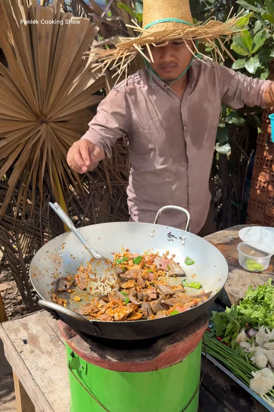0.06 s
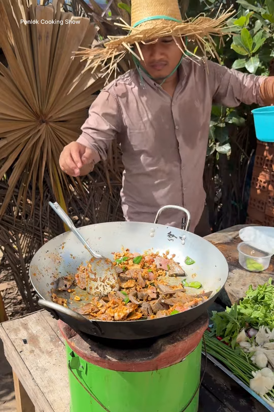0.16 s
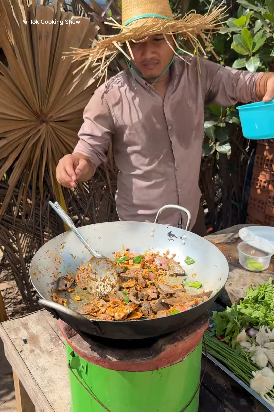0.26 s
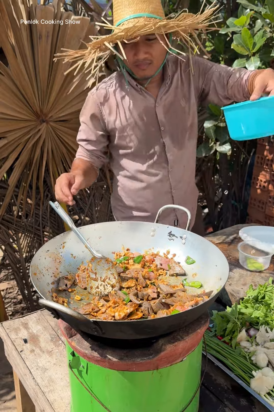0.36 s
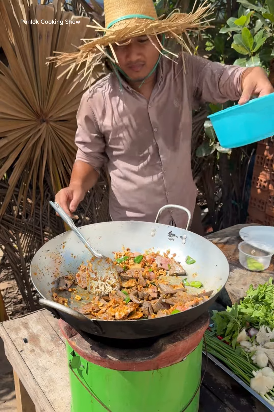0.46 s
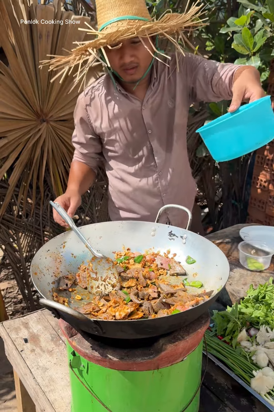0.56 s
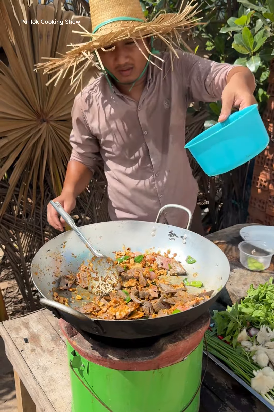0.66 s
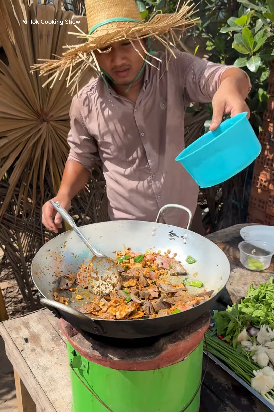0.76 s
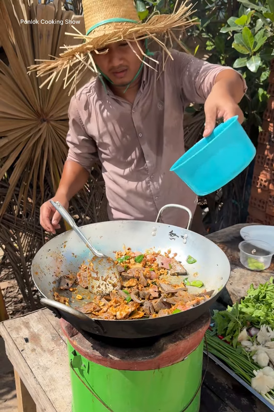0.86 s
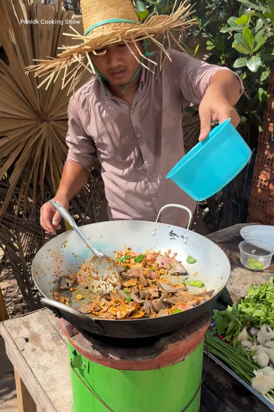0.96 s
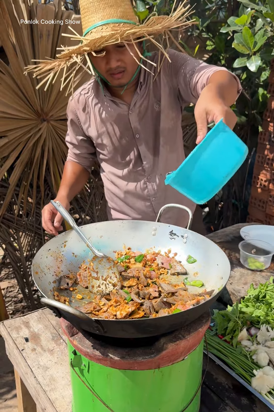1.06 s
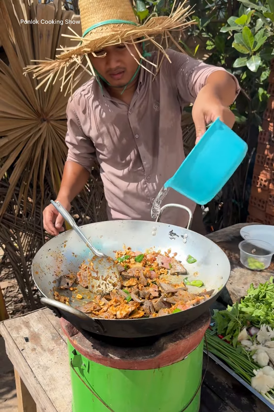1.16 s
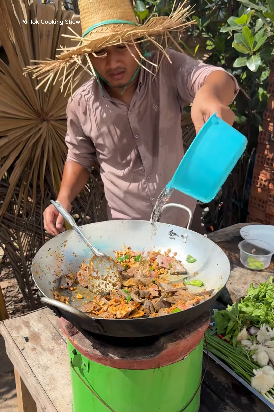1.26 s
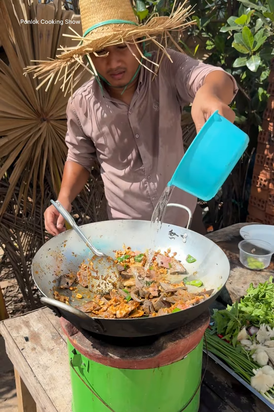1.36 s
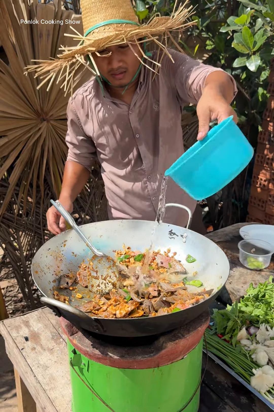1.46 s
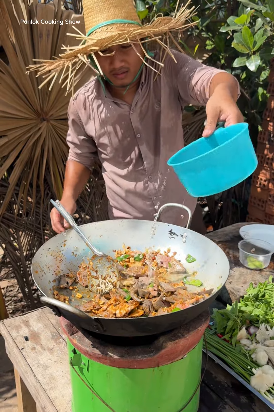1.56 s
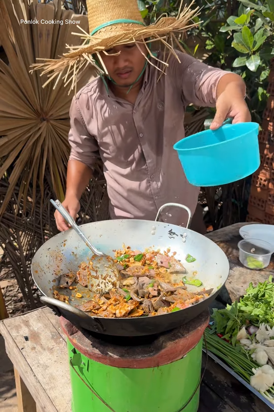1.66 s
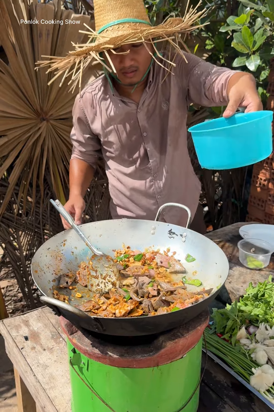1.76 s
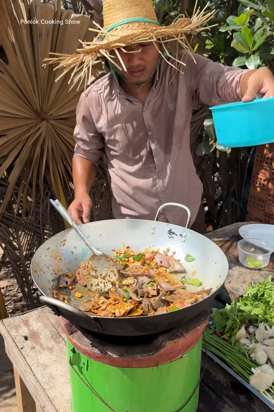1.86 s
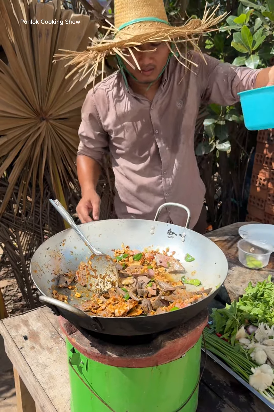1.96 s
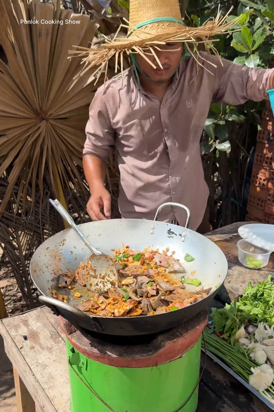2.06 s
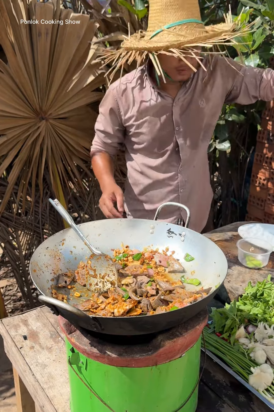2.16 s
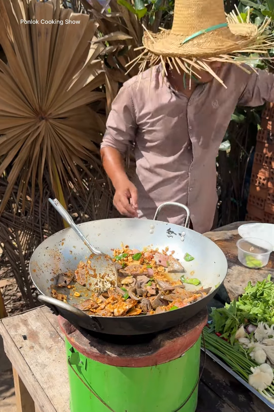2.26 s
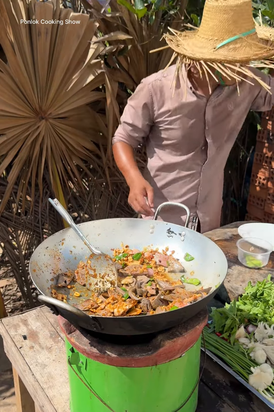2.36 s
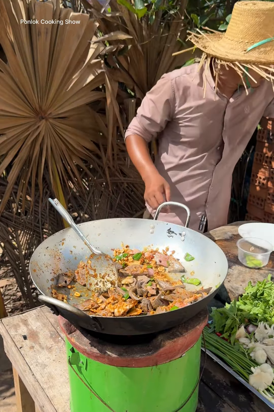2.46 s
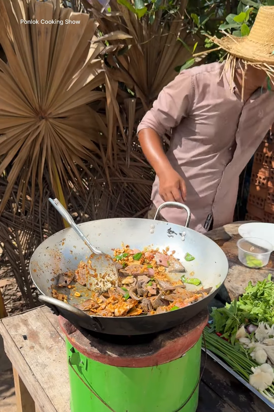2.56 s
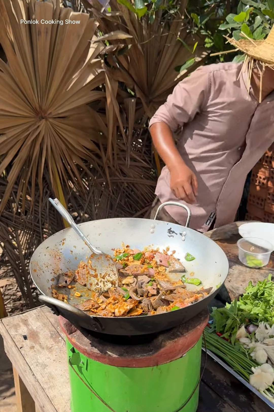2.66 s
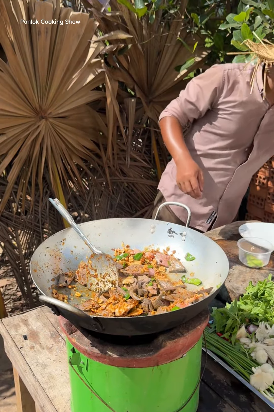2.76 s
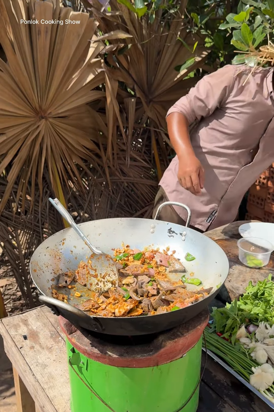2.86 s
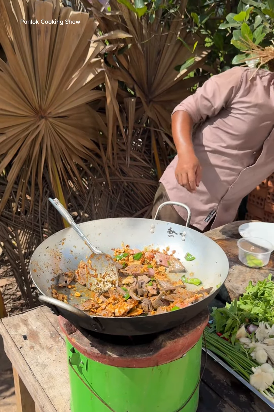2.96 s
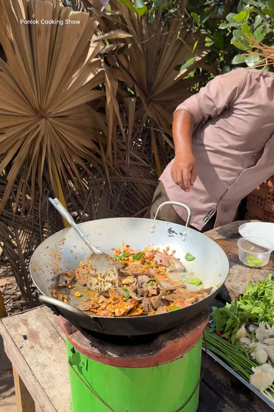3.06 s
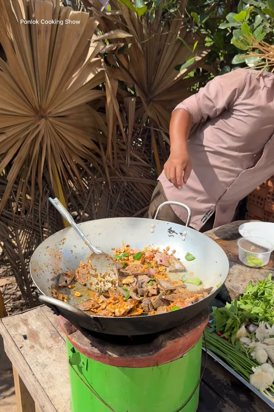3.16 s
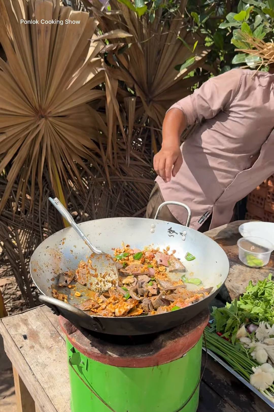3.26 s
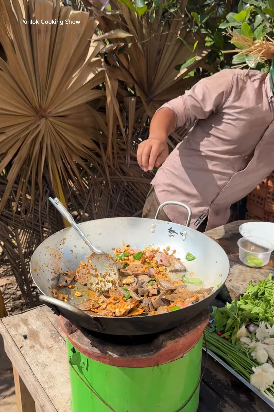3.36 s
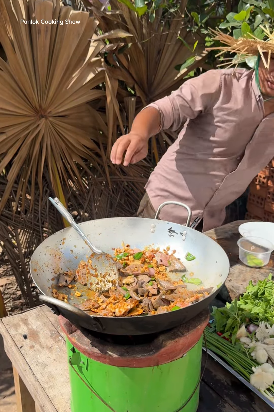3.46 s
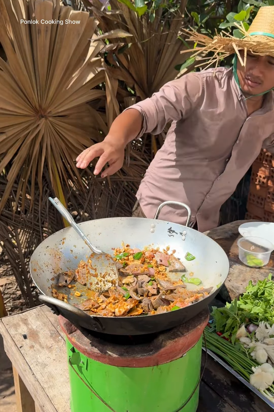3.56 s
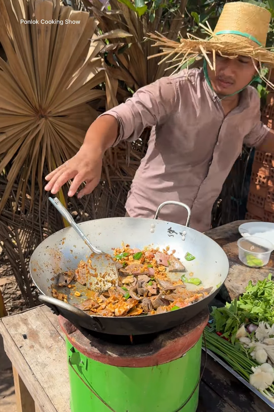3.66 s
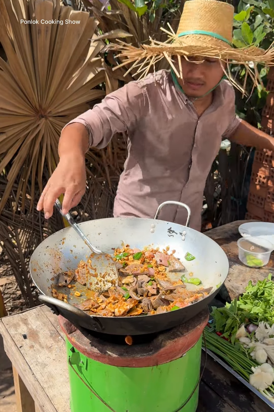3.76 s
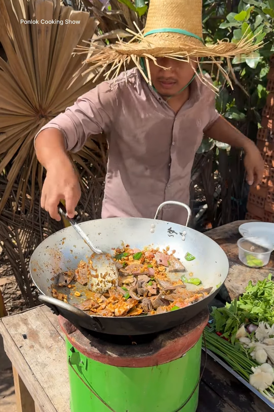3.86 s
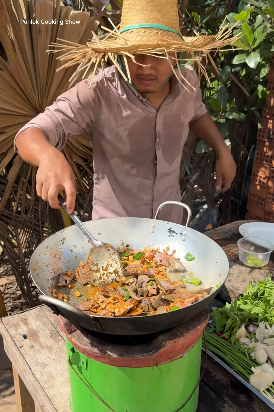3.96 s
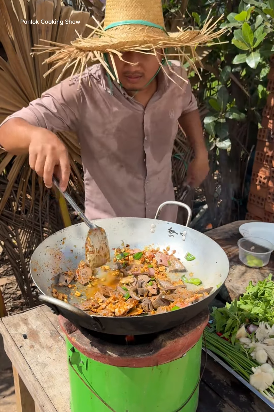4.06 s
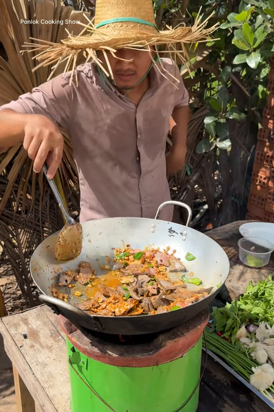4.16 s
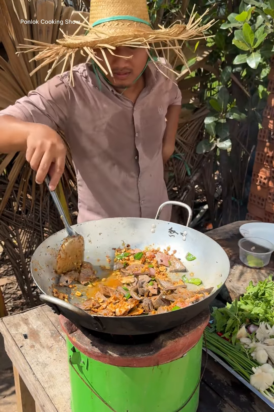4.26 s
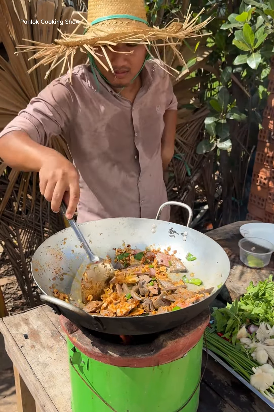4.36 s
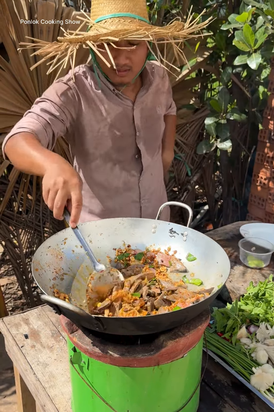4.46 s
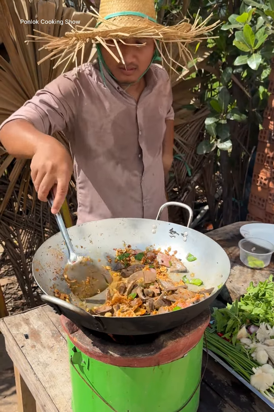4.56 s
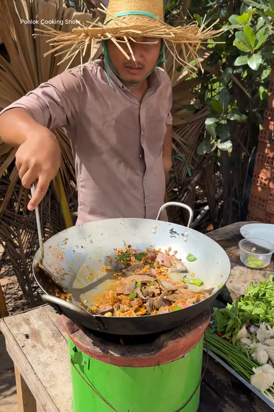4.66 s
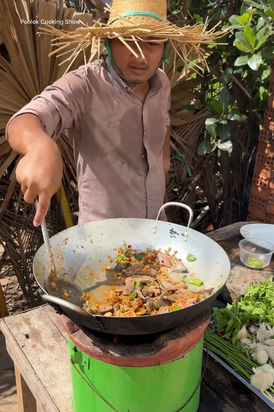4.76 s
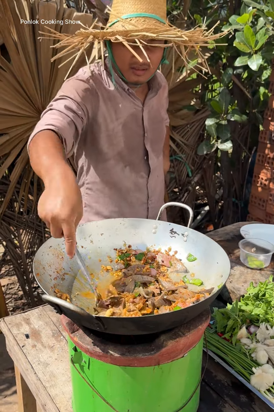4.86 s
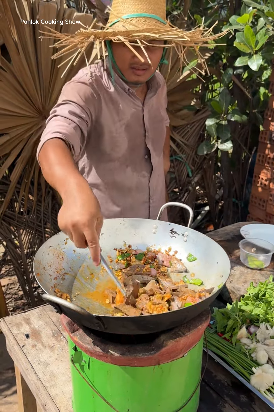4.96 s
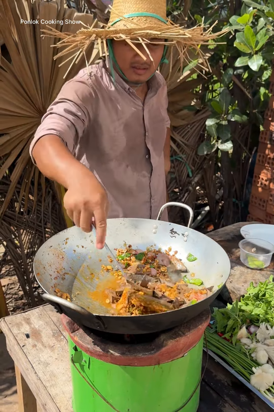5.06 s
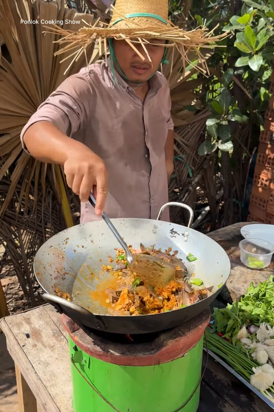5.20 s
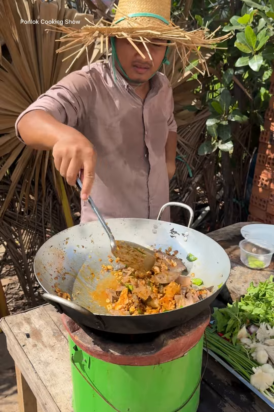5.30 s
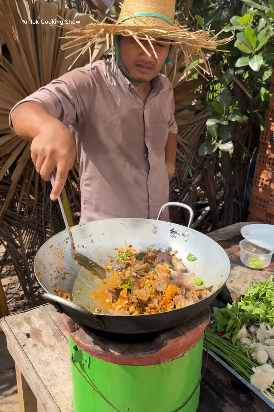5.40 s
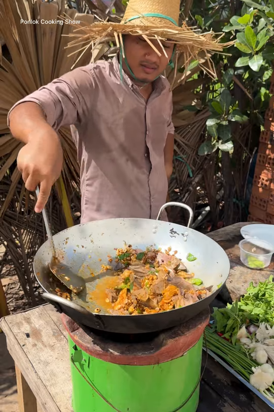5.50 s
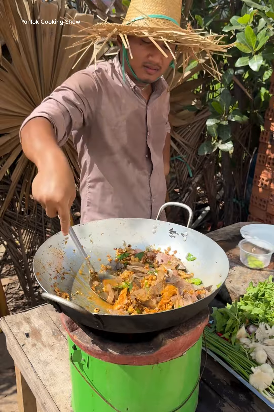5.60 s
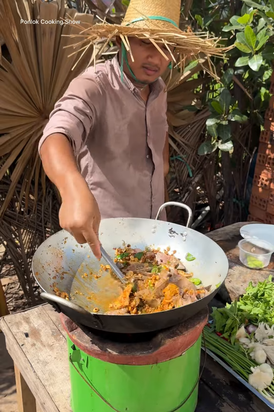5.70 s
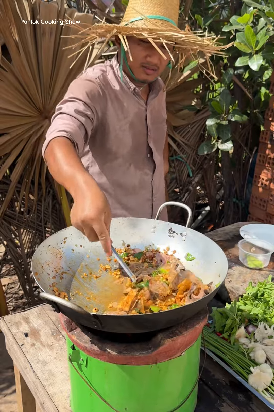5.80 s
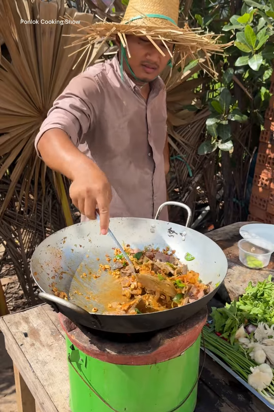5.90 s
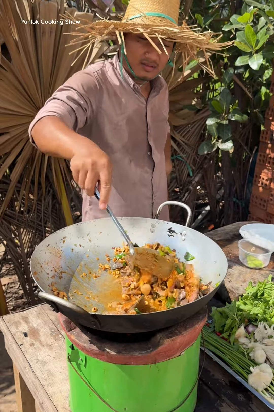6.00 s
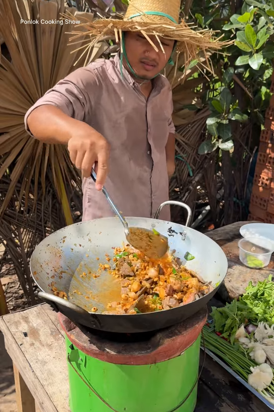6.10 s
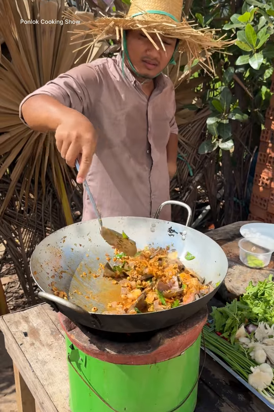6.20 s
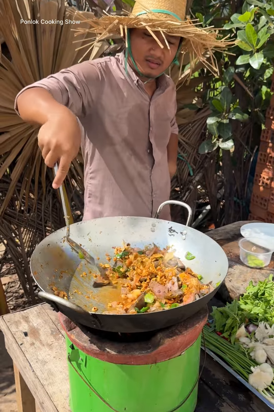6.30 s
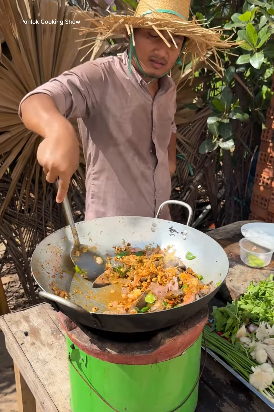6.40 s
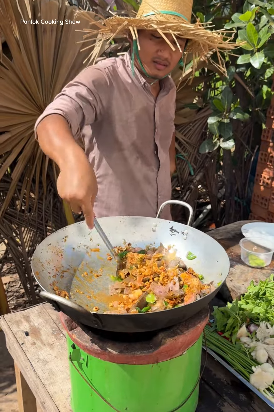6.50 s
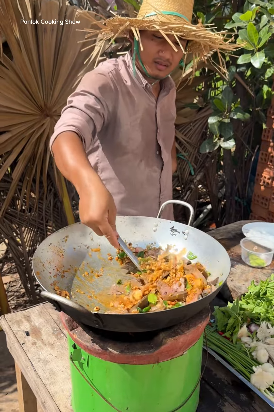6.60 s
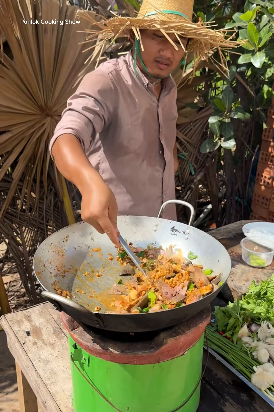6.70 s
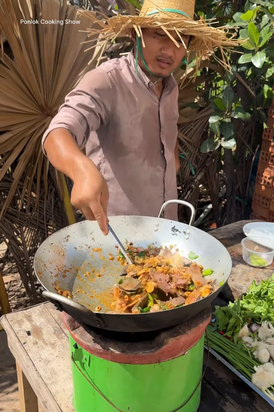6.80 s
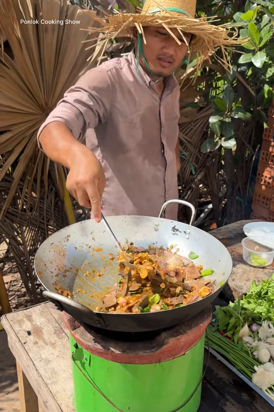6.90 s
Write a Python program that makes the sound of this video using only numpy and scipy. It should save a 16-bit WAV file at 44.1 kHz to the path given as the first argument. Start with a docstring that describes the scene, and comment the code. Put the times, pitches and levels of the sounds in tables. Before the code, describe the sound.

Steady outdoor frying swells with a splash of water, a plastic basin is set down, and a steel spatula scrapes and clanks through the wok.

```python
"""Meat sizzles in a steel wok outdoors, as thousands of tiny bubbles burst in juice and oil.
A splash of water flashes to steam and makes the sizzle flare; a plastic basin is put down and rings.
Then a metal spatula clacks against the pan, exciting the modes of both, and scrapes through the food
by stick-slip friction. A far engine thuds in harmonics of its firing rate and a bird peeps.
A closely spaced pair of microphones hears it all."""
import sys
import numpy as np
from scipy import signal
from scipy.fft import rfft, irfft
from scipy.io import wavfile

SR = 44100
rng = np.random.default_rng(int(sys.argv[2]) if len(sys.argv) > 2 else 0)


def master_out(mix):
    """Clip the mix to full scale and print it as 16-bit PCM to the path in sys.argv[1]."""
    frames = np.transpose(np.atleast_2d(mix))
    ceiling = np.clip(frames, -1, 1)
    pcm = np.round(ceiling * 32767).astype(np.int16)
    wavfile.write(sys.argv[1], SR, pcm)


N = 306054
TIME = np.arange(N) / SR
BIN_HZ = np.maximum(np.arange(N // 2 + 1) * SR / N, 1)


def from_db(db):
    """Amplitude grows tenfold with every 20 dB."""
    return 10 ** (np.asarray(db) / 20)


def unit_rms(x):
    """Normalisation to a mean power of 1."""
    return x / np.sqrt(np.mean(x ** 2) + 1e-20)


def at_hz(points, hz):
    """Interpolation of a curve on a logarithmic frequency axis."""
    point_hz, values = np.transpose(points)
    return np.interp(np.log(hz), np.log(point_hz), values)


def coloured(x, spectrum):
    """Filtering imposes a spectral envelope that rolls off beyond its ends; the result has rms 1."""
    skirts = 1 / (1 + (spectrum[0][0] / BIN_HZ) ** 4) / (1 + (BIN_HZ / spectrum[-1][0] / 2) ** 4)
    return unit_rms(irfft(rfft(x) * from_db(at_hz(spectrum, BIN_HZ)) * skirts, N))


def noise(spectrum):
    """Two independent rows of filtered Gaussian noise."""
    return coloured(rng.standard_normal((2, N)), spectrum)


def smoothed(x, corner_hz):
    """A low-pass filter keeps the slow fluctuations; the result has rms 1."""
    return unit_rms(irfft(rfft(x) / (1 + (BIN_HZ / corner_hz) ** 2), N))


def drift(corner_hz):
    """Low-passed noise serves as a random modulation."""
    return smoothed(rng.standard_normal(N), corner_hz)


def grains(per_s, spread_db):
    """Shot noise: random impulses of uneven size, as a direct and a scattered row."""
    sizes = from_db(spread_db * np.minimum(rng.exponential(1, (2, N)), 5))
    signs = rng.choice([-1, 1], (2, N))
    occurs = rng.random((2, N)) < per_s / SR
    return unit_rms(sizes * signs * occurs)


def clicks(times, levels_db):
    """An impulse train, with one level for each time."""
    return np.bincount((np.asarray(times) * SR).astype(int), from_db(levels_db), N)


def ring(x, hz, t60):
    """A damped resonator answers a unit impulse with a decaying sine of height 1."""
    radius, angle = from_db(-60 / (t60 * SR)), 2 * np.pi * hz / SR
    return signal.lfilter([0, np.sin(angle)], [1, -2 * radius * np.cos(angle), radius ** 2], x + 1e-18)


def decay(x, t60):
    """Exponential decay: each impulse becomes an envelope that falls 60 dB in t60 seconds."""
    return signal.lfilter([1], [1, -from_db(-60 / (t60 * SR))], x + 1e-18)


def ramp(start_s, length_s):
    """A linear rise from 0 to 1."""
    return np.clip((TIME - start_s) / max(length_s, 1e-3), 0, 1)


def swell(peak_s, rise_db_per_s, fall_db_per_s):
    """Exponential growth to a gain of 1, then exponential decay."""
    return from_db(np.minimum(rise_db_per_s * (TIME - peak_s), fall_db_per_s * (peak_s - TIME)))


def phase(hz):
    """Phase in radians is the running integral of frequency."""
    return 2 * np.pi * np.cumsum(hz) / SR


def mismatch(hz, spot_hz, reach_octaves):
    """Selective excitation: 0 at the pitch that a contact spot drives best, nearing 1 far from it."""
    return 1 - np.exp(-(np.log2(hz / spot_hz) / reach_octaves) ** 2)


def direct(x):
    """A purely direct field: the scattered row is silent."""
    return np.stack([x, np.zeros(N)])


# Each row: frequency in Hz, coherence of left and right from 0 to 1.
COHERENCE = [(130, .75), (300, .93), (500, .88), (750, .55), (1250, .92), (2200, .9), (3400, .7),
             (4600, .88), (5500, .7), (7200, .45), (7800, .9), (8700, .78), (9600, .99), (12200, .93),
             (14000, .98)]
# Each row: frequency in Hz, phase lead of the left side in radians.
PHASE_LEAD = [(250, 0), (600, .35), (790, -1.3), (1150, -.15), (2000, -.1), (2700, 1.1), (3300, 1.3),
              (3750, .1), (5800, -.1), (6500, -.7), (7150, -2.3), (7600, -.1), (8100, -.1), (8700, -.9)]
# Each row: frequency in Hz, left minus right level in dB.
BALANCE = [(300, -1), (600, 4.5), (900, -0.5), (1300, -3.5), (2200, -2), (3300, 3), (4000, 2.5),
           (5500, 0.5), (6400, 0), (7300, 3.5), (9000, -0.5)]
def microphones(sound, treble_hz=8120, hz_per_turn=2990):
    """A spaced pair: direct sound is shared, shifted in phase and level; scattered sound differs."""
    coherence = np.clip(at_hz(COHERENCE, BIN_HZ), 0, 1)
    shared, apart = rfft(sound) * np.sqrt([(1 + coherence) / 2, (1 - coherence) / 2])
    delay_phase = -2 * np.pi * (BIN_HZ - treble_hz) / hz_per_turn  # a plain delay in the treble
    lead = at_hz(PHASE_LEAD, BIN_HZ)
    lead = np.where(BIN_HZ > treble_hz, np.minimum(lead, delay_phase), lead)
    tilt = from_db(at_hz(BALANCE, BIN_HZ) / 2) * np.exp(.5j * lead)
    return irfft(np.stack([(shared + apart) * tilt, (shared - apart) / tilt]), N)


# Each row: frequency in Hz, relative spectral density in dB.
RUMBLE_SPECTRUM = [(20, -18), (35, -15), (50, -0.5), (66, 3), (90, -5.5), (140, -3.5), (190, -15),
                   (250, -13.5), (330, -17), (600, -30), (1500, -25.5)]
def rumble(firing_phase, steady_db=-48, gust_db=-43, throb=0.17):
    """Amplitude modulation: the low noise of stove and air throbs with the engine and lifts in a gust."""
    gust = from_db(gust_db) * swell(peak_s=6.2, rise_db_per_s=16, fall_db_per_s=16)
    level = np.hypot(from_db(steady_db), gust)
    return level * noise(RUMBLE_SPECTRUM) * (1 + throb * np.cos(firing_phase))


# Each row: multiple of the firing rate, relative level in dB.
ENGINE_ORDERS = [(2, -53.5), (3, -59.5), (4, -55), (5, -50), (6, -52), (7, -62), (8, -69.5), (9, -65.5),
                 (10, -65)]
def engine(firing_phase, gain_db=1.5, waver_db=2.0, smear_radians=0.6):
    """Periodic firing gives a harmonic series, which arrives from afar along two wavering paths."""
    hum = np.zeros((2, N))
    for order, db in ENGINE_ORDERS:
        amplitude = np.sqrt(2) * from_db(db + waver_db * drift(3.1))
        offset = rng.normal(0, smear_radians)
        paths = np.stack([np.zeros(N), 2 * drift(0.9)])
        hum += amplitude * np.cos(order * firing_phase + offset + paths)
    return from_db(gain_db) * swell(peak_s=2.64, rise_db_per_s=0.5, fall_db_per_s=2) * hum


def background(firing_hz=24.25, wander=0.0031):
    """Common modulation: engine and rumble follow one slowly wandering firing rate."""
    firing_phase = phase(firing_hz * (1 + wander * drift(0.8)))
    return engine(firing_phase) + rumble(firing_phase)


# Each row: start in seconds, length in seconds, top pitch in Hz, level in dB, droop in octaves.
BIRD_PEEPS = [(3.795, .075, 4150, -44, .17), (3.96, .07, 4070, -44.5, .09), (4.575, .07, 4320, -47.5, .08)]
def bird(crest=0.16, quaver_db=2.5, wobble=0.007):
    """Frequency modulation: each slightly unsteady note rises a little and then droops."""
    notes, unsteady = np.zeros(N), 1 + wobble * drift(240)
    for start, length, top_hz, db, droop in BIRD_PEEPS:
        along = ramp(start, length)
        pitch = top_hz * 2 ** (-droop * ((along - crest) / (1 - crest)) ** 2) * unsteady
        notes += from_db(db) * np.sin(np.pi * along) * np.sin(phase(pitch))
    return direct(notes * from_db(quaver_db * drift(100)))


# Each row: time in seconds, strength of the blow in dB.
BASIN_KNOCKS = [(3.4162, -23.5), (3.4291, -28.5), (3.4387, -42)]
# Each row: frequency in Hz, relative level in dB, t60 in seconds, left minus right level in dB.
BASIN_MODES = [(320, -15, 0.11, -2), (405, -21, 0.16, -3), (470, -4.5, 0.22, -7), (520, -9, 0.092, -4),
               (624, -5.5, 0.2, 7), (860, -18, 0.045, -2), (1005, -7, 0.068, -8), (1300, -12, .06, -3),
               (1598, -8.5, 0.088, -3), (1820, -16, .05, -2), (2830, -11, .04, 0)]
# Each row: frequency in Hz, relative spectral density in dB.
RATTLE_SPECTRUM = [(250, 0.5), (500, 1.0), (1500, -8.0), (2500, -12.0), (5000, -19.5), (9000, -21)]
def basin(rattle_db=-7, rattle_t60=0.22):
    """Modal radiation: hollow plastic lands to the right and rocks flat; each mode beams its own way."""
    blows = clicks(*np.transpose(BASIN_KNOCKS))
    modes = np.zeros((2, N))
    for k, (hz, db, t60, side_db) in enumerate(BASIN_MODES):
        left_right = from_db([[db + side_db / 2], [db - side_db / 2]])
        modes += (-1) ** k * left_right * ring(blows, hz, t60)
    rattle = decay(blows, rattle_t60) * noise(RATTLE_SPECTRUM)
    return modes + from_db(rattle_db) * microphones(rattle)


def struck(modes, times, levels_db, spot_hz, far_db, reach_octaves):
    """Free vibration: modes ring after each blow, strongest near the pitch that the spot favours."""
    ringing = np.zeros(N)
    for hz, mode_db, t60 in modes:
        strength_db = levels_db + mode_db + far_db * mismatch(hz, spot_hz, reach_octaves)
        strength_db += rng.normal(0, 1, len(times))
        ringing += rng.choice([-1, 1]) * ring(clicks(times, strength_db), hz, t60)
    return ringing


def rubbed(modes, slips, t60, spot_hz, far_db, reach_octaves):
    """Forced vibration: slips keep the modes ringing while the edge damps them; rms is about 1."""
    gains = np.array([from_db(db + far_db * mismatch(hz, spot_hz, reach_octaves)) for hz, db, _ in modes])
    rings = np.array([(-1) ** k * unit_rms(ring(slips, hz, t60)) for k, (hz, _, _) in enumerate(modes)])
    return np.sum(gains[:, None] * rings, axis=0) / np.linalg.norm(gains, axis=0)


# Each row: frequency in Hz, relative spectral density in dB.
CRACK_SPECTRUM = [(300, -39), (1450, -18), (2200, -4), (2950, -6), (3600, -3), (6500, -5.5), (11000, 4.5),
                  (16000, 3.5)]
def crack(touches, t60=0.0089, zing_db=-13, zing_t60=0.045):
    """A brief contact has a broad spectrum: steel meets steel in a bright burst with a faint tail."""
    envelope = decay(touches, t60) + from_db(zing_db) * decay(touches, zing_t60)
    return envelope * noise(CRACK_SPECTRUM)


# Each row: frequency in Hz, relative spectral density in dB.
CLATTER_SPECTRUM = [(120, -25), (300, 6.5), (550, 6), (780, 6), (1200, 2.5), (2200, 1), (2950, -5),
                    (3500, 1), (4300, -2.5), (5300, -6), (5800, -17), (7000, -5.5), (11000, -9),
                    (16000, -6.5)]
def clatter(times, levels_db, t60s, spots_hz, far_db=-7, yard_db=-26, yard_t60=1.0):
    """Modal overlap: crowded, short-lived modes of the steel merge into noise; the yard reverberates."""
    bursts, length = np.zeros((2, N)), SR // 2
    age, hz = TIME[:length], np.maximum(np.fft.rfftfreq(length, 1 / SR), 1)
    for start, db, t60, spot_hz in zip(times, levels_db, t60s, spots_hz):
        colour = from_db(at_hz(CLATTER_SPECTRUM, hz) + far_db * mismatch(hz, spot_hz, reach_octaves=1))
        crowd = unit_rms(irfft(rfft(rng.standard_normal((2, length))) * colour, length))
        envelope = from_db(-60 * age / t60) + from_db(yard_db - 60 * age / yard_t60)
        first = int(start * SR)
        bursts[:, first:first + length] += (from_db(db) * envelope * crowd)[:, :N - first]
    return bursts


# The wok with the spatula on it. Each row: frequency in Hz, relative level in dB, t60 in seconds.
WOK_MODES = [(147, -7, 0.24), (205, -9.5, 0.15), (255, -1, 0.13), (282.6, -12, 0.96), (337, 5, 0.067),
             (371.5, -1.5, 0.19), (415.5, -2, 0.15), (475.4, -4.5, 0.18), (519, -0.5, 0.08),
             (658, 0.5, .072), (975, -3, 0.042), (1260, -4, 0.092), (1633, -4.5, 0.09), (1745, -7, .13),
             (1885, -3.5, 0.092), (2100, -4, 0.1), (2214, 0, 0.039), (2376, -4, 0.065), (2500, -1, 0.07)]
# The spatula's steel blade. Each row: frequency in Hz, relative level in dB, t60 in seconds.
BLADE_MODES = [(3280, -3, .04), (3500, -4, .05), (3820, -2, .05), (4110, -3, .085), (4385, -3, .06),
               (4560, -3, .045), (4940, -1, .06), (5140, -4, .045), (5338, -1.5, .09), (5566, -1, .08),
               (6030, -5, .04), (6230, -5, .06), (6360, -6, .04), (7520, -4, .05), (8120, 0, .045),
               (8350, 0, .04), (8720, 1, .055)]
# Each row: time in seconds, crack in dB, clatter in dB, clatter t60 in seconds, wok ring in dB,
# pitch the wok's spot favours in Hz, its reach in octaves, blade ring in dB, pitch it favours in Hz.
SPATULA_CLACKS = [(4.1728, -7, -15.5, 0.03, -18.5, 1225, .2, -32, 4400),
                  (4.1763, -33, -35, .036, -21.5, 2500, 0.13, -34, 8750),
                  (4.178, -45, -42, .04, -24, 244, 0.2, -45, 3400),
                  (4.189, -16, -34, 0.081, -34, 477, .2, -37, 5500),
                  (4.2114, -9.5, -32, .14, -28, 2430, .2, -22.5, 3980),
                  (4.217, -30, -38, .08, -28, 1040, 0.29, -26, 6200),
                  (4.226, -34, -27.5, 0.11, -21, 227, 0.26, -41, 4400),
                  (4.308, -22, -49, .05, -26.5, 1340, 0.21, -37, 4900),
                  (4.393, -30, -28, 0.031, -39, 1654, .26, -33, 4900),
                  (4.411, -38, -33, 0.11, -30, 2210, .26, -39, 4000),
                  (4.66, -22.5, -30, 0.084, -25.5, 245, 0.2, -37, 4400),
                  (4.673, -42, -31, .054, -31.5, 1740, .26, -44, 3400),
                  (4.696, -52, -50, .058, -28.5, 318, .26, -57, 4100),
                  (4.741, -48, -48, .04, -39, 2150, .2, -50, 4100),
                  (4.777, -27, -44, .03, -52, 2000, .26, -50, 8400),
                  (4.797, -29, -54, .07, -44, 2150, 0.24, -41, 5300),
                  (4.851, -18, -47, .078, -27, 2060, 0.13, -40, 5400),
                  (5.5148, -11.5, -22, 0.048, -12, 1880, 0.13, -22.5, 8900),
                  (5.516, -19, -31, 0.041, -25.5, 354, 0.24, -22.5, 3580),
                  (5.522, -23, -47, .052, -31, 650, 0.24, -30, 4910),
                  (5.5277, -20, -32, 0.11, -25, 2420, .12, -32, 4200),
                  (6.3522, -7.5, -26, .03, -16, 2180, 0.099, -19, 6050),
                  (6.356, -37, -29.5, 0.31, -12.5, 158, 0.31, -37, 3300),
                  (6.3658, -25, -29, .05, -14, 255, .15, -25, 5300),
                  (6.3672, -45, -45, .04, -23.5, 1640, .1, -40, 4100),
                  (6.3752, -27, -37, .04, -17.5, 350, .22, -23, 4110),
                  (6.3833, -45, -33, .04, -18.5, 285, .1, -45, 4100),
                  (6.3937, -15.5, -20, .028, -25, 485, 0.22, -25, 6170),
                  (6.397, -38, -40, .04, -30, 1740, .15, -38, 4100),
                  (6.907, -42, -38, .037, -42, 2210, .26, -50, 4200)]
def clacks():
    """Impact excitation: spatula on wok gives a sharp crack, a dense clatter and the ring of both."""
    (times, crack_db, clatter_db, clatter_t60,
     wok_db, spot_hz, reach, blade_db, blade_hz) = np.transpose(SPATULA_CLACKS)
    impacts = crack(clicks(times, crack_db)) + clatter(times, clatter_db, clatter_t60, spot_hz)
    wok = struck(WOK_MODES, times, wok_db, spot_hz, far_db=-23.5, reach_octaves=reach)
    blade = struck(BLADE_MODES, times, blade_db, blade_hz, far_db=-13, reach_octaves=0.11)
    return impacts + direct(wok + blade)


# Each row: time in seconds, level in dB.
SPATULA_THUDS = [(6.5212, -21), (6.573, -29), (6.585, -33), (6.597, -30), (6.61, -34)]
# Each row: frequency in Hz, relative spectral density in dB.
THUD_SPECTRUM = [(300, -5), (600, -1), (1250, 1), (2100, -2), (2600, -13), (5000, -24), (9000, -34)]
def thuds(t60=0.04, wok_db=-9):
    """Cushioned impact: food under the blade leaves a dull knock and a little of the wok's low ring."""
    times, db = np.transpose(SPATULA_THUDS)
    knock = decay(clicks(times, db), t60) * noise(THUD_SPECTRUM)
    wok = struck(WOK_MODES, times, db + wok_db, spot_hz=420, far_db=-16, reach_octaves=0.3)
    return knock + direct(wok)


# Each row: times of start, hardest push, lift and meeting the food in seconds; relative levels of
# groan, grinding and rasp in dB; groan pitch, first and last edge pitch and favoured blade pitch in Hz.
SPATULA_STROKES = [(4.181, 4.19, 4.18, 4.21, -46, -37, -30, 300, 2300, 2400, 4000),
                   (4.262, 4.398, 4.455, 4.37, -33, -34, -37.5, 392, 1484, 2230, 4850),
                   (4.692, 4.702, 5, 4.4, -37.5, -53, -61, 370, 2010, 2090, 4100),
                   (4.794, 4.868, 4.925, 4.945, -40, -38, -33, 350, 2064, 1900, 5360),
                   (5.559, 5.65, 5.86, 5.585, -35.5, -40.5, -42.5, 427, 2068, 1151, 8550),
                   (6.016, 6.037, 6.1, 5.7, -43, -51, -43, 370, 980, 853, 4300),
                   (6.43, 6.503, 6.505, 6.3, -33, -46, -40, 340, 1793, 1513, 3500),
                   (6.535, 6.595, 6.56, 5.7, -46, -34, -43, 365, 2300, 1750, 3300)]
def strokes(mode_hz, bite_s=0.0032, lift_s=0.055, push_db=7.5, muffle_db=14, muffle_s=0.043):
    """Friction follows the normal force: each push sets the gains, and the edge's tilt sets its pitch."""
    grind, rasp = np.zeros((2, N))
    edge_hz, blade_hz = np.ones((2, N))
    groans = np.zeros((len(mode_hz), N))
    for (start, hardest, end, food, groan_db, grind_db, rasp_db,
         groan_hz, first_hz, last_hz, favoured_hz) in SPATULA_STROKES:
        contact = ramp(start, bite_s) * (1 - ramp(end, lift_s))
        push = from_db(push_db * (ramp(start, hardest - start) - 1 - ramp(hardest, end - hardest)))
        shares = from_db(-18 * mismatch(mode_hz, groan_hz, reach_octaves=0.33))
        groans += np.outer(shares / np.linalg.norm(shares), from_db(groan_db) * contact * push ** 3)
        grind += from_db(grind_db) * contact * push
        rasp += from_db(rasp_db - muffle_db * ramp(food, muffle_s)) * contact * push
        glide_hz = first_hz + (last_hz - first_hz) * ramp(start, end - start)
        edge_hz = np.where(TIME >= start, glide_hz, edge_hz)
        blade_hz[TIME >= start] = favoured_hz
    return groans, grind, rasp, edge_hz, blade_hz


# Dull grinding and bright rasp. Each row: frequency in Hz, relative spectral density in dB.
GRIND_SPECTRUM = [(400, -30), (600, 7.5), (850, 5.5), (1050, -6), (1300, -1), (1600, 4), (2200, 4),
                  (2900, 3.5), (4200, 0), (7000, -31)]
RASP_SPECTRUM = [(2500, 3), (4000, 0), (4700, 0.5), (5400, -6), (6200, 0.5), (8500, -4.5), (9700, 0),
                 (11000, 5.5), (12500, -6), (14000, 4.5), (16000, -26)]
def scrapes(groan_db=-5, grind_db=-5, grit_db=4, edge_db=-8, pan_db=-4.5, judder_db=2.05):
    """Stick-slip friction: the edge catches and slides on the steel, and each slip rings pan and blade."""
    low_hz = np.array([hz for hz, _, _ in WOK_MODES if 230 < hz < 600])
    high_modes = [mode for mode in WOK_MODES if mode[0] > 900]
    groans, grind, rasp, edge_hz, blade_hz = strokes(low_hz)
    judder = from_db(judder_db * drift(170))
    slips = grains(per_s=1600, spread_db=2.0) * judder
    groan = sum(gain * unit_rms(ring(slips, hz, t60=0.087)) for hz, gain in zip(low_hz, groans))
    edge = np.sqrt(2) * smoothed(slips, corner_hz=110) * np.cos(phase(edge_hz))  # a gliding noise band
    grit = coloured(grains(per_s=2400, spread_db=2.8) * judder, RASP_SPECTRUM)
    pan = rubbed(high_modes, slips, t60=0.048, spot_hz=edge_hz, far_db=-9.5, reach_octaves=0.35)
    blade = rubbed(BLADE_MODES, slips, t60=0.05, spot_hz=blade_hz, far_db=-4.5, reach_octaves=0.078)
    grinding = from_db(grind_db) * coloured(slips, GRIND_SPECTRUM)
    grinding += from_db(edge_db) * edge + from_db(pan_db) * pan
    return from_db(groan_db) * groan + grind * grinding + rasp * (from_db(grit_db) * grit + blade)


# Each row: start in seconds, length in seconds, first pitch in Hz, last pitch in Hz, level in dB.
EDGE_SQUEAKS = [(4.395, 0.037, 375.7, 352, -23.5), (4.428, 0.052, 359.4, 346, -32),
                (4.419, 0.077, 996, 854, -39), (4.794, 0.053, 325, 387, -31.5),
                (4.872, 0.12, 361.4, 343, -47), (5.718, 0.1, 1406, 1210, -50),
                (6.01, 0.07, 1010, 820, -39.5)]
def squeaks(attack_s=0.017, quaver_db=3.0, wobble=0.016):
    """Periodic stick-slip: the slips fall into step as a wavering tone that swells, glides and fades."""
    tones, unsteady = np.zeros(N), 1 + wobble * drift(95)
    for start, length, first_hz, last_hz, db in EDGE_SQUEAKS:
        along = ramp(start, length)
        pitch = (first_hz + (last_hz - first_hz) * along ** 1.42) * unsteady
        tones += from_db(db) * ramp(start, attack_s) * (1 - along ** 2) * np.sin(phase(pitch))
    return direct(tones * from_db(quaver_db * drift(120)))


DROPS_S, TRICKLE_S, GUSH_S = 0.49, 0.854, 1.474  # the water reaches the wok in three stages
def pour(centre_hz=355, cycles=16, level_db=-44.5, lag_s=0.13):
    """Bubble resonance: air trapped by the stream rings low, mostly near one pitch, just after the gush."""
    bubbles = np.zeros(N)
    for hz in centre_hz * 2 ** (np.arange(-2, 9) / 8):
        births = grains(per_s=82, spread_db=1.5)[0]
        bubbles += ring(births, hz, cycles / hz) / (1 + 11 * abs(np.log2(hz / centre_hz)))
    flow = swell(GUSH_S + lag_s, rise_db_per_s=70, fall_db_per_s=23)
    return direct(from_db(level_db) * flow * unit_rms(bubbles))


def steam_flash():
    """Flash boiling: the envelope of the gush turning to steam on the hot steel."""
    return swell(GUSH_S, rise_db_per_s=73, fall_db_per_s=39)


# Each row: frequency in Hz, relative spectral density in dB.
SEETHE_SPECTRUM = [(1100, -2), (2000, -3), (2500, -2), (3400, -32)]
def seethe(level_db=-38):
    """Larger bubbles sound lower: where the gush lands, the water boils coarsely for a moment."""
    bubbles = coloured(grains(per_s=3000, spread_db=2.5), SEETHE_SPECTRUM)
    return from_db(level_db) * steam_flash() * bubbles


def juice_vigour(steady_db=-47.5, sink_db_per_s=1, flash_db=-39.5, water_db=-40):
    """Incoherent sources add in power: steady boiling, the flash of steam and water boiling off."""
    steady = from_db(steady_db - sink_db_per_s * TIME)
    water = ramp(TRICKLE_S, 0.023) * swell(GUSH_S, rise_db_per_s=5.5, fall_db_per_s=2)
    return np.linalg.norm([steady, from_db(flash_db) * steam_flash(), from_db(water_db) * water], axis=0)


def oil_vigour(steady_db=-41, sink_db_per_s=1.24, flash_db=-38.5, water_db=-34, stirred_db=-2.5):
    """The same power sum for the oil, which sheds its water fast and quietens as the food is turned."""
    steady = from_db(steady_db - sink_db_per_s * TIME + stirred_db * ramp(4.5, 0.48))
    water = ramp(DROPS_S, 0.29) * swell(GUSH_S, rise_db_per_s=11, fall_db_per_s=13.5)
    return np.linalg.norm([steady, from_db(flash_db) * steam_flash(), from_db(water_db) * water], axis=0)


def pops(cycles=7, relative_db=-11.5):
    """Damped resonance: single larger bubbles burst from the juice, each with a short pitched ping."""
    pitches_hz = np.geomspace(1500, 4500, 10)
    pings = sum(ring(grains(per_s=9, spread_db=2.5)[0], hz, cycles / hz) for hz in pitches_hz)
    return direct(from_db(relative_db) * juice_vigour() * unit_rms(pings))


# Boiling juice and fizzing oil. Each row: frequency in Hz, relative spectral density in dB.
JUICE_SPECTRUM = [(200, -18), (380, -4.5), (720, -7.5), (1090, -4), (1260, 4), (1450, -5.5), (2100, 1.5),
                  (3100, 2), (3600, -3.5), (4200, -1.5), (5200, -6.5), (5750, -16.5), (6400, -10.5),
                  (10000, -14.5)]
OIL_SPECTRUM = [(2000, -8), (4500, -6.5), (5700, -9.5), (6500, -7.5), (7500, -8), (9500, -5.5), (11000, 0),
                (12500, -4.5), (13800, 2), (15700, -4.5)]
# Drops that spit in the fat. Each row: time in seconds, level in dB.
FAT_SPITS = [(0.721, -40), (1.319, -42), (1.851, -37), (1.942, -37), (2.062, -32), (2.626, -39),
             (2.765, -38), (3.24, -30), (3.249, -32.5), (4.531, -41)]
def sizzle(juice_gain_db=0.5, oil_gain_db=3.0, flicker_db=1.0, spit_t60=0.038):
    """Shot noise of bursting bubbles: juice boils in the midrange, oil fizzes above, stray drops spit."""
    boil = coloured(grains(per_s=5500, spread_db=2.5), JUICE_SPECTRUM)
    boil *= from_db(juice_gain_db + flicker_db * drift(35))
    fizz = coloured(grains(per_s=14000, spread_db=3.0), OIL_SPECTRUM)
    fizz *= from_db(oil_gain_db + flicker_db * drift(32))
    spits = decay(clicks(*np.transpose(FAT_SPITS)), spit_t60) * noise(RASP_SPECTRUM)
    return juice_vigour() * boil + oil_vigour() * fizz + spits


def scene():
    """Superposition: wok, spatula and yard sum at the microphones; the basin is already in stereo."""
    frying = sizzle() + pops() + seethe() + pour()
    spatula = clacks() + thuds() + scrapes() + squeaks()
    return microphones(frying + spatula + bird() + background()) + basin()


def record(dry):
    """Band limiting: an elliptic low-pass cuts the top steeply."""
    cutoff_hz = 15800
    return signal.sosfilt(signal.ellip(12, .1, 90, cutoff_hz, fs=SR, output="sos"), dry)


dry = scene()
out = record(dry)
master_out(out)
```